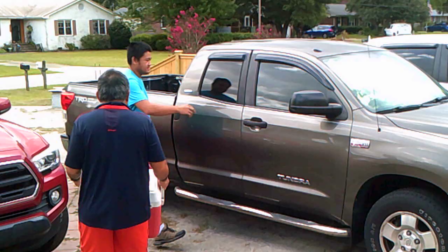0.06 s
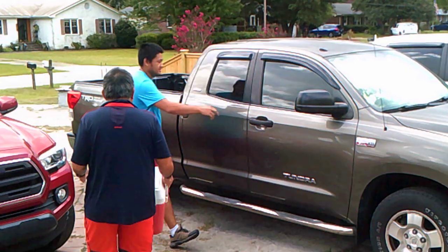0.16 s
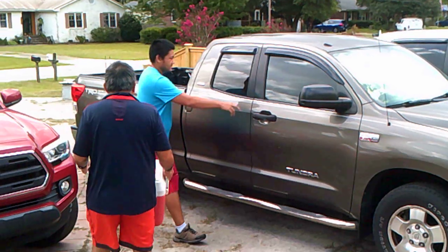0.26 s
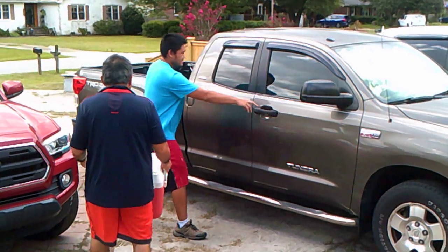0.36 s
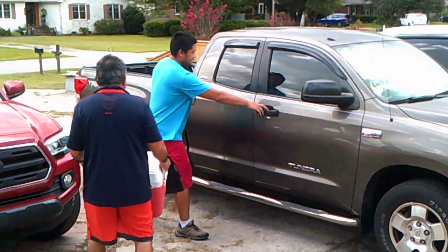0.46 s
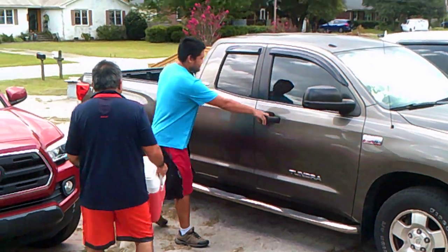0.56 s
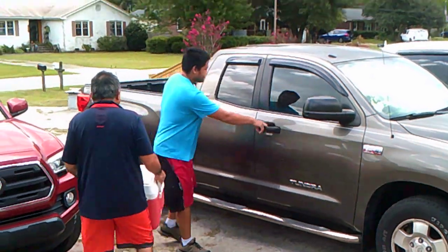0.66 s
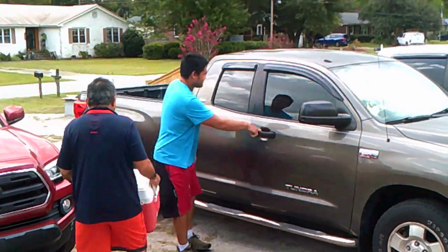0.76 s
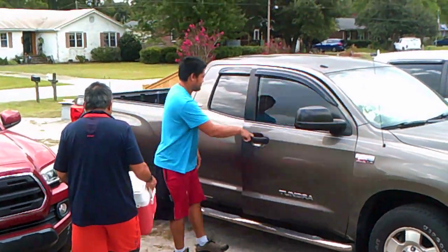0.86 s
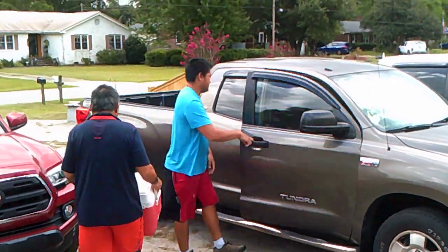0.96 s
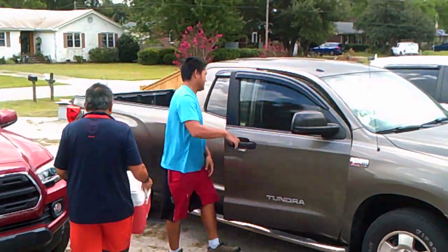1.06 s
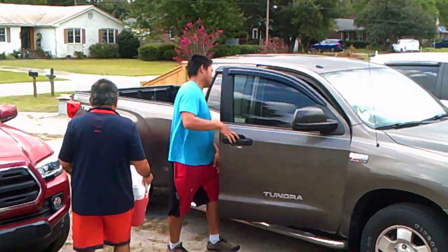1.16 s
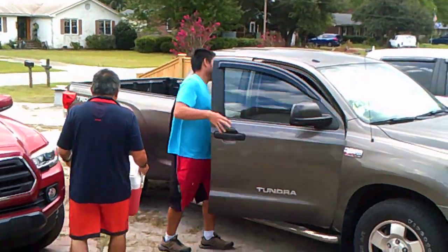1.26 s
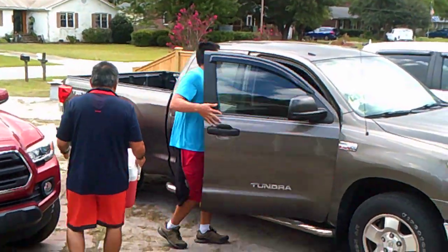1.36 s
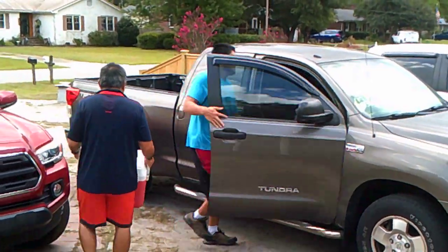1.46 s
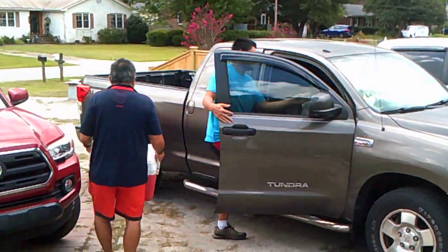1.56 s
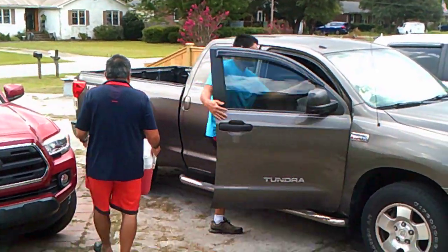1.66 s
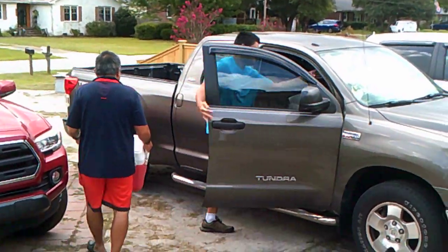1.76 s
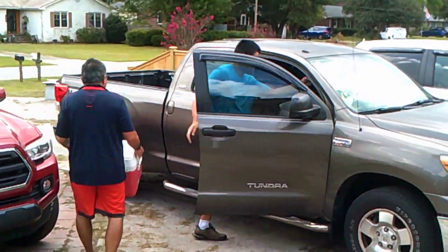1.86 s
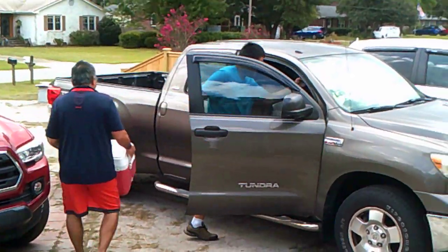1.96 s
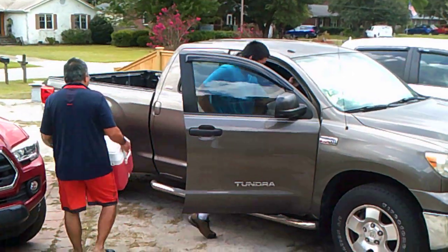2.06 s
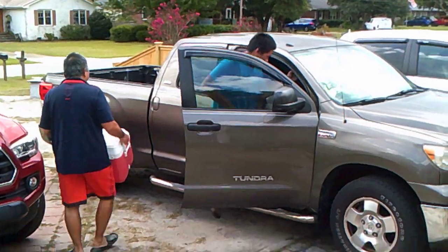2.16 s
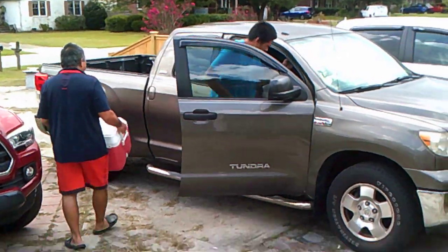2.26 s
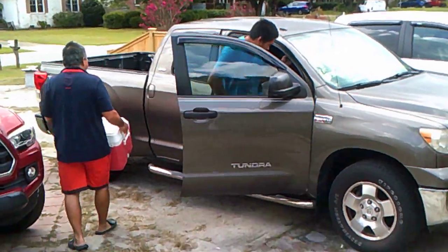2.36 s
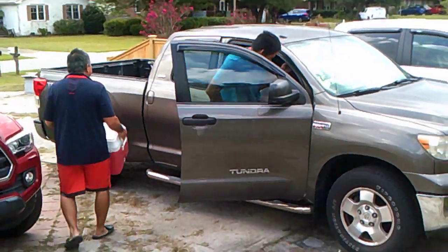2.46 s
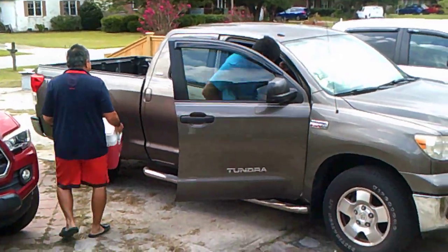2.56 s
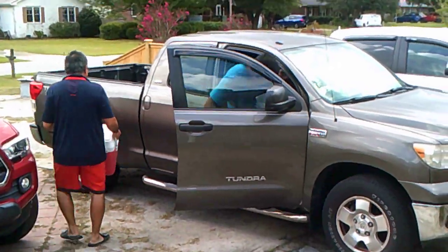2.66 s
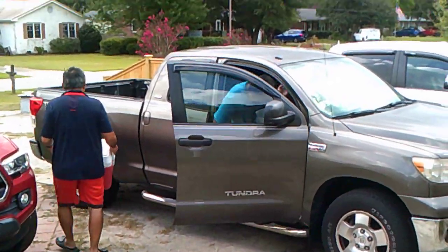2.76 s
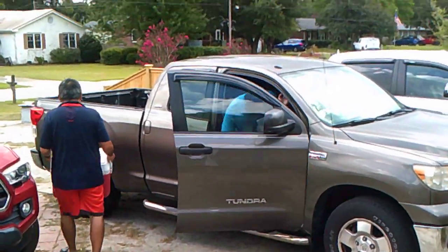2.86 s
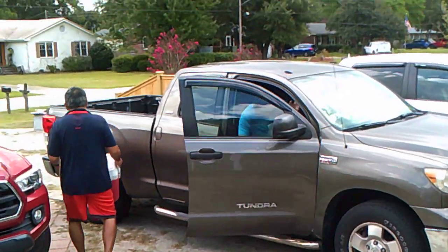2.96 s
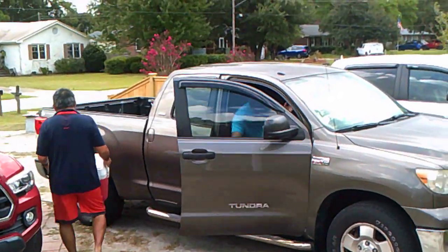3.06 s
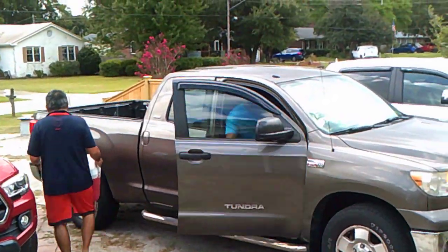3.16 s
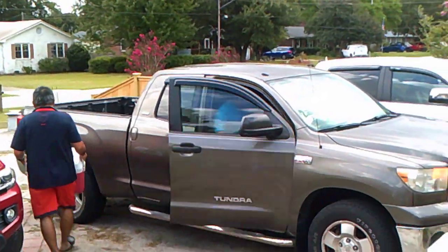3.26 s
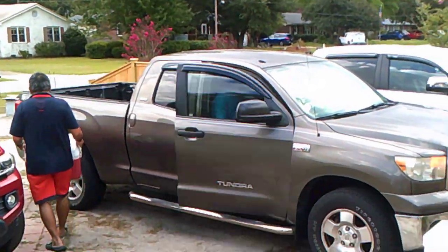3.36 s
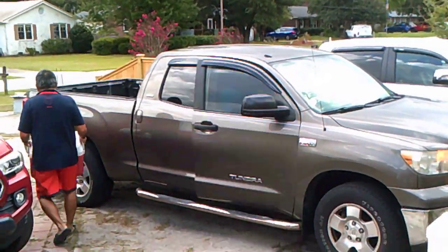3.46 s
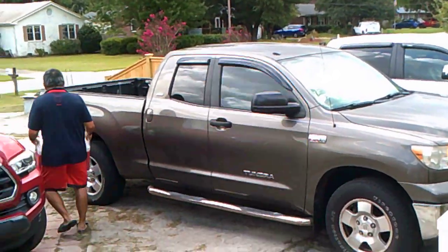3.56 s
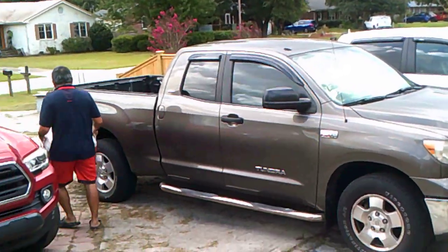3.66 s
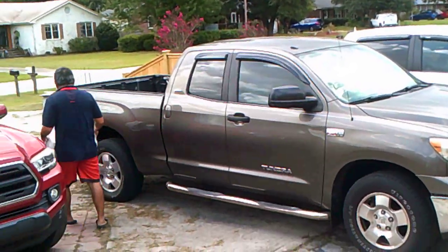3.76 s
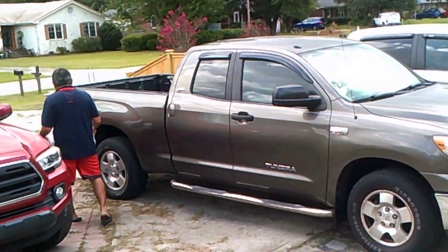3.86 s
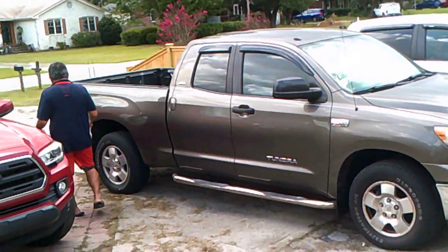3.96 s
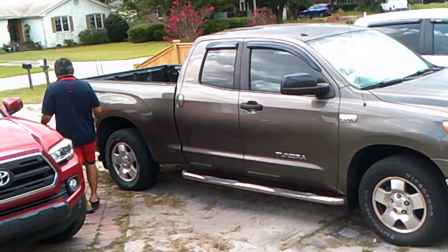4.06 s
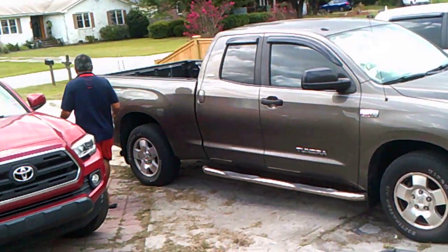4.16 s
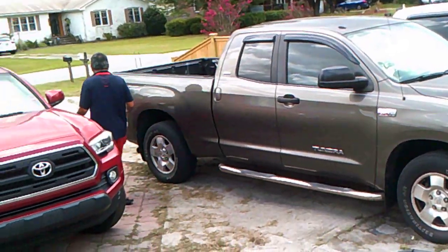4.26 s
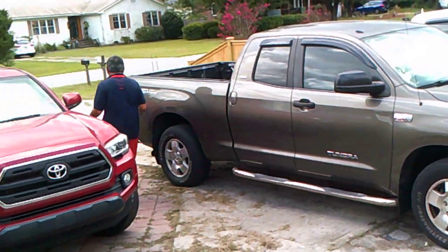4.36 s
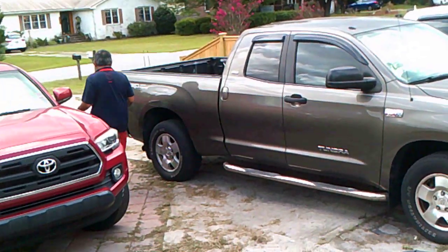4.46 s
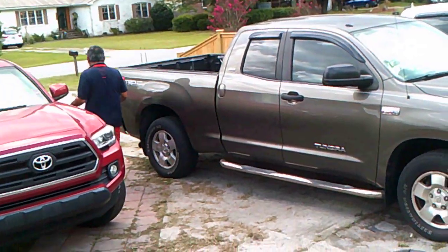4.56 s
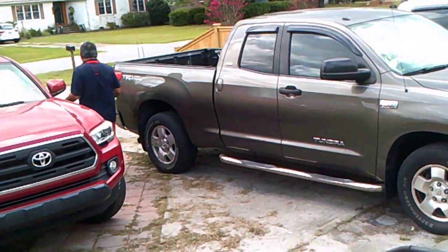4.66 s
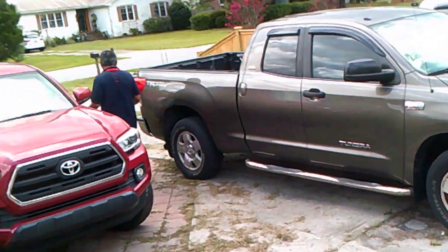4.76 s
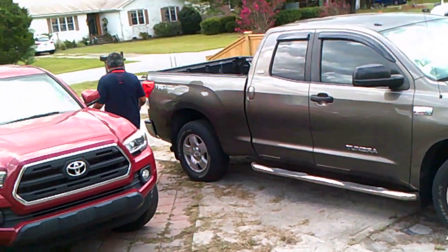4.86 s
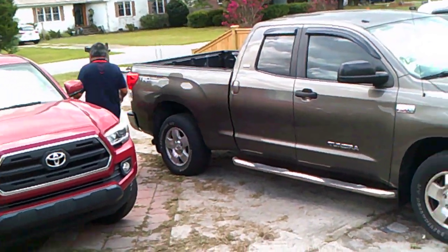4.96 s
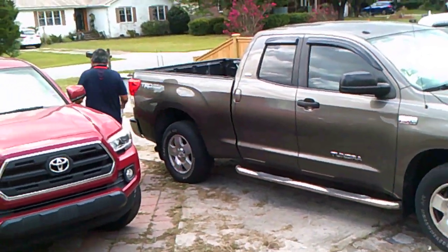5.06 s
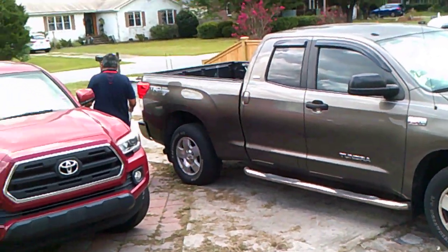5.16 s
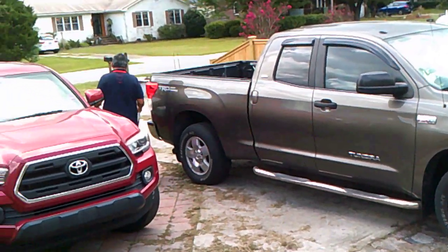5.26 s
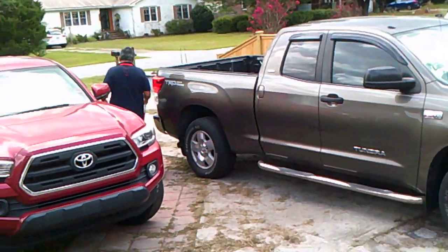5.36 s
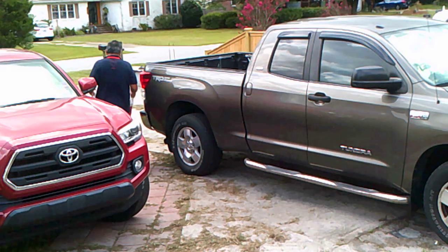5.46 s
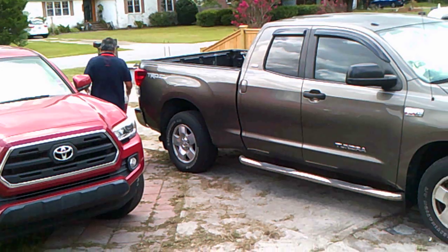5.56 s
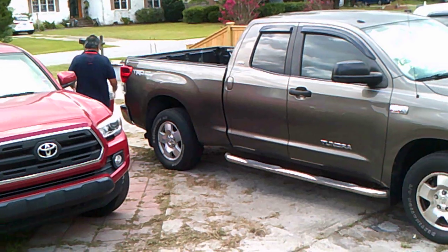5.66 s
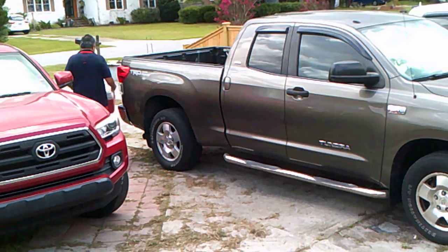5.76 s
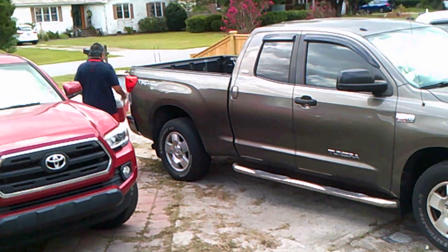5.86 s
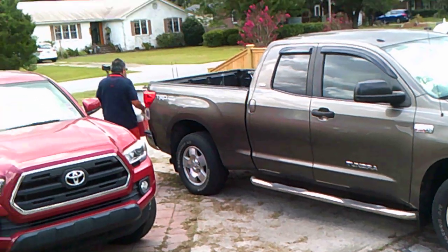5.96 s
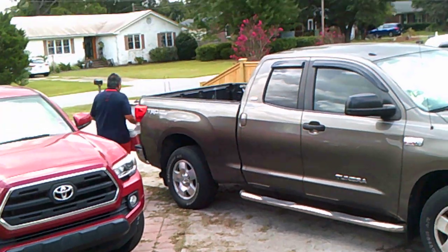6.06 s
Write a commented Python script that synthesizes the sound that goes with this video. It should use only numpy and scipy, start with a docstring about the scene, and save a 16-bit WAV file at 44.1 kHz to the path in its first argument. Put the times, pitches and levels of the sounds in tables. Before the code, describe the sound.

Over constant outdoor hiss and easing breeze, a truck door thumps shut, another unlatches with a sharp clack, and finally slams with a booming, distorted thud.

```python
"""On a driveway a pickup's rear door thuds shut, the front handle is gripped and its latch snaps open.
Someone climbs in and slams the door, whose push of air overloads a dull little microphone; the door shudders to rest.
Blows are decaying door modes, rattle and crack noise; the cab's air and body swing as low damped sines.
Shoes scuff the paving as swells of noise, over a steady hiss, faint wavering tones and a breeze that slowly eases."""
import sys
import numpy as np
from scipy import signal
from scipy.fft import rfft, irfft, next_fast_len
from scipy.io import wavfile
from scipy.ndimage import uniform_filter1d

SR = 44100
rng = np.random.default_rng(int(sys.argv[2]) if len(sys.argv) > 2 else 0)


def store_pcm(level_fs):
    """Save levels as 16-bit WAV."""
    pcm = np.round(np.clip(level_fs, -1, 1) * 32767).astype(np.int16)
    wavfile.write(sys.argv[1], SR, np.atleast_2d(pcm).T)


N = 269451  # samples

# Modes of the struck door. Each row: frequency in Hz, relative level in dB, T60 in seconds.
DOOR_MODES = [(145.8, 2, 0.31), (200.3, -4.5, .24), (285, -15, 0.37), (342, -7, 0.062), (432, -15, 0.42),
              (569, 0, 0.076), (617, -5.5, .1), (876, -4.5, 0.21), (1023, -9.5, 0.19), (1047, -10, .14),
              (1230, -7.5, 0.11), (1344, -0.5, 0.2), (1612, 2.5, 0.092), (1610, -20, 0.093),
              (1950, -11.5, 0.074), (2536, -30, 0.09)]
# Rattle spectrum of latch and trim. Each row: frequency in Hz, relative density in dB per Hz.
RATTLE_SPECTRUM = [(60, -13), (150, 2.5), (390, -8.5), (900, -3), (1500, 0.5), (2100, -9.5), (3000, -18.5),
                   (4000, -31.5), (5200, -47.5), (7500, -34.5), (9500, -68)]
# Decay of that rattle, before each blow scales it. Each row: frequency in Hz, T60 in seconds.
RATTLE_DECAY = [(150, .2), (800, 0.13), (1600, 0.092), (3000, 0.039), (7000, .04)]
# Crack spectrum of steel on steel. Each row: frequency in Hz, relative density in dB per Hz.
CRACK_SPECTRUM = [(200, -26), (1000, 5), (1800, -2.5), (3000, -30), (4000, 1.5), (5200, -5), (7000, -5.5),
                  (8500, -36.5), (10000, -40.5)]

# A shutting door hits the latch's two notches, and rebounds if slammed. Each row: start in seconds, level in dB.
LATCH_STRIKES = [(0.102, -8.5), (0.11, -9), (3.524, 1), (3.542, -3), (3.573, -3)]
# After the slam the door shudders in evenly spaced, ever weaker blows.
SHUDDER_S, SHUDDER_GAP_S, SHUDDER_DB, SHUDDER_FALL_DB_PER_S = 3.592, 0.012, -16, 230

# A moving door pushes on the cab's air. Each row: start in seconds, level in dB, frequency in Hz, T60 in seconds.
AIR_PUSHES = [(0.104, 2, 25.9, 0.56), (0.731, -6, 23.3, 0.53), (3.513, 18, 32.3, 0.19),
              (3.553, 25, 25, 0.1064)]
# Swing of cab and roof after each push. Each row: frequency in Hz, relative level in dB, T60 in seconds.
CAB_MODES = [(28.27, -6, 0.4), (55.2, -13.5, 0.4), (91.9, -19, 0.8)]
CAB_LAG_S, CAB_FULL_DB = 0.06, 2.5  # the swing's delay, and the push beyond which it grows no further

# The pulled handle snaps the latch open. Each row: start in seconds, level in dB.
LATCH_CLACKS = [(1.152, -1), (1.1587, -2.5), (1.165, -8.5), (1.178, -12)]
CRACK_DB, CRACK_PER_DB = 15, 1.2  # crack of a 0 dB clack; softer clacks lose it faster than their body

# Soft blows on a door panel from a seal, a hand or a knee.
# Each row: start in seconds, level in dB, panel boom in dB.
PANEL_THUMPS = [(0.086, -25, 14), (0.141, -19.5, 13), (0.662, -14.5, 1), (1.965, -27.5, -1),
                (3.502, -18, -7)]
# Small fittings click as the cab is boarded. Each row: start in seconds, level in dB, brightness in dB per octave.
FITTING_TICKS = [(2.404, -26, 13), (2.413, -20.5, 13), (2.418, -18.5, 2.5), (2.874, -21, 8),
                 (2.889, -21, 4)]

# Scuffs of shoes and clothes.
# Each row: middle in seconds, seconds from there to a fall of e squared, level in dB.
SCUFF_STROKES = [(0.244, 0.12, -39), (0.648, 0.085, -32.5), (0.79, 0.07, -35.5), (0.916, 0.11, -31),
                 (2.608, 0.23, -32.5), (3.731, 0.034, -33.5), (4.02, 0.15, -31), (4.144, 0.046, -36.5),
                 (4.32, 0.06, -39)]
# Friction spectrum of the scuffs. Each row: frequency in Hz, relative density in dB per Hz.
SCUFF_SPECTRUM = [(300, -21.5), (900, -14.5), (1600, 4), (2700, -7.5), (3800, -14.5), (5000, -22.5),
                  (7500, -21), (9500, -48.5)]

# Outdoor hiss spectrum. Each row: frequency in Hz, relative density in dB per Hz.
HISS_SPECTRUM = [(60, 1), (130, 0), (250, -0.5), (420, -9), (700, -4), (1150, -3.5), (1520, -1), (1710, 3),
                 (1880, -3.5), (2750, -18.5), (3600, -23.5), (4700, -37.5), (7800, -31), (9500, -63.5)]
HISS_DB = -29
# Breeze spectrum at the microphone. Each row: frequency in Hz, relative density in dB per Hz.
BREEZE_SPECTRUM = [(8, -3), (20, 0), (35, -1.5), (50, -1.5), (75, -14.5), (110, -14), (180, -33),
                   (400, -49.5), (1000, -92.5)]
BREEZE_DB, BREEZE_EASE_DB_PER_S = -19, 1.67  # level at the start, and its steady fall
# Faint machine hum. Each row: mean frequency in Hz, level in dB, start in seconds, end in seconds.
HUM_TONES = [(901, -44, 3, 6.3), (164.8, -45.5, 3.5, 6.3), (247.4, -50, 3, 4.8), (282.5, -47.5, 0, 3.1)]

CEILING = 0.705  # amplitude at which the input clips
EDGE_HZ = 15700  # upper band limit


def amp(db):
    """Decibel law: 20 dB is a tenfold amplitude."""
    return 10 ** (np.asarray(db) / 20)


def unit(x):
    """Normalisation of a signal to rms 1."""
    return x / np.sqrt(np.mean(x ** 2) + 1e-20)


def read(points, hz):
    """Linear interpolation of a curve on a log-frequency axis."""
    f, value = np.transpose(points)
    return np.interp(np.log(hz + 1), np.log(f + 1), value)


def add(mix, s, sound):
    """Superposition: a sound is summed into the mix from time s."""
    part = mix[max(round(s * SR), 0):][:len(sound)]
    part += sound[:len(part)]


def noise(colour, count=N):
    """Spectral shaping: white noise is weighted by the given spectrum and brought to rms 1."""
    size = next_fast_len(count)
    hz = np.fft.rfftfreq(size, 1 / SR)
    white = rfft(rng.standard_normal(size))
    return unit(irfft(white * amp(read(colour, hz)), size)[:count])


def drift(rate):
    """Random modulation: Gaussian low-pass noise of rms 1, changing about rate times a second."""
    size = next_fast_len(N)
    hz = np.fft.rfftfreq(size, 1 / SR)
    white = rfft(rng.standard_normal(size))
    return unit(irfft(white * np.exp(-(hz / rate) ** 2), size)[:N])


def knock(boom_db, boom_hz, tilt_db, decay, crack_db, ring_db=-14, rattle_db=-1, boom_octaves=0.59, crack_t60=0.011):
    """Impact excitation: a brief crack, then the door's modes ring and loose parts rattle, the treble dying first."""
    t = np.arange(SR // 2) / SR

    def colour(f):
        """Contact hardness tilts the spectrum; the struck panel shapes one region."""
        tilt = tilt_db * np.log2(np.clip(f, 400, 4000) / 1200)
        boom = boom_db * np.exp(-(np.log2((f + 1) / boom_hz) / boom_octaves) ** 2)
        return tilt + boom

    ring = np.zeros(len(t))
    for f, db, t60 in DOOR_MODES:
        envelope = amp(db + colour(f) - 60 * t / (t60 * decay))
        ring += envelope * np.sin(2 * np.pi * (f * t + rng.random()))

    # the rattle decays at its own rate in each frequency band
    hz, age, bands = signal.stft(noise(RATTLE_SPECTRUM, len(t)), SR, nperseg=512)
    hz = hz[:, None]
    band_gain = amp(colour(hz) - 60 * age / (read(RATTLE_DECAY, hz) * decay))
    rattle = signal.istft(bands * band_gain, SR, nperseg=512)[1][:len(t)]

    crack = noise(CRACK_SPECTRUM, len(t)) * amp(crack_db - 60 * t / crack_t60)
    onset = 1 - np.exp(-(t / 0.0008) ** 2)
    return (amp(ring_db) * ring + amp(rattle_db) * rattle + crack) * onset


def push(hz, t60):
    """Damped oscillation: a low swing starts from rest and dies away exponentially."""
    t = np.arange(SR) / SR
    onset = 1 - np.exp(-t / 0.0016)
    return amp(-60 * t / t60) * np.sin(2 * np.pi * hz * t) * onset


def truck():
    """Superposition of all the blows and air pushes."""
    return slam() + cab() + latches() + panels() + fittings()


def slam(count=5):
    """Repeated impact: doors strike their latches hard and short; after the slam a hollow shudder dies away."""
    out = np.zeros(N)
    for s, db in LATCH_STRIKES:
        strike = knock(boom_db=3.0, boom_hz=620, tilt_db=-2.0, decay=0.6, crack_db=1.5)
        add(out, s, amp(db) * strike)
    for age in SHUDDER_GAP_S * np.arange(count):
        blow = knock(boom_db=9.5, boom_hz=344, tilt_db=-5, decay=1.0, crack_db=-3.5)
        add(out, SHUDDER_S + age, amp(SHUDDER_DB - SHUDDER_FALL_DB_PER_S * age) * blow)
    return out


def cab():
    """Cavity and body resonance: each push of air is followed by a limited swing of cab and roof."""
    out = np.zeros(N)
    swing = sum(amp(db) * push(hz, t60) for hz, db, t60 in CAB_MODES)
    for s, db, hz, t60 in AIR_PUSHES:
        add(out, s, amp(db) * push(hz, t60))
        add(out, s + CAB_LAG_S, amp(min(db, CAB_FULL_DB)) * swing)
    return out


def latches():
    """Level-dependent impact of steel: the harder the blow, the more of it is crack."""
    out = np.zeros(N)
    for s, db in LATCH_CLACKS:
        crack_db = CRACK_DB + CRACK_PER_DB * db
        clack = knock(boom_db=4, boom_hz=172, tilt_db=1.0, decay=0.93, crack_db=crack_db)
        add(out, s, amp(db) * clack)
    return out


def panels():
    """Soft contact excites mostly low modes: dull thumps leave the door ringing."""
    out = np.zeros(N)
    for s, db, boom_db in PANEL_THUMPS:
        thump = knock(boom_db, boom_hz=145, tilt_db=-2.5, decay=1.58, crack_db=-11)
        add(out, s, amp(db) * thump)
    return out


def fittings(steel_s=2.416, steel_hz=478, steel_db=-34, steel_t60=1.6):
    """Light impact gives thin clicks; one lightly damped steel part sings as the cab takes a person's weight."""
    out, t = np.zeros(N), np.arange(SR) / SR
    for s, db, tilt_db in FITTING_TICKS:
        tick = knock(boom_db=-13.5, boom_hz=200, tilt_db=tilt_db, decay=1.0, crack_db=-6)
        add(out, s, amp(db) * tick)
    add(out, steel_s, amp(steel_db - 60 * t / steel_t60) * np.sin(2 * np.pi * steel_hz * t))
    return out


def scuffs(grain_db=4, shuffle_db=-55, restless_db=3):
    """Friction noise: short gritty swells over a faint, restless shuffling."""
    t = np.arange(N) / SR
    stroke = amp(shuffle_db + restless_db * drift(7))
    for s, length, db in SCUFF_STROKES:
        stroke += amp(db) * np.exp(-2 * ((t - s) / length) ** 2)
    grit = unit(noise(SCUFF_SPECTRUM) * amp(grain_db * drift(130)))
    return stroke * grit


def outdoors(flutter_db=0.41, gust_db=1.5):
    """Broadband ambient noise: a steady hiss, and a lumpy breeze on the microphone that slowly eases."""
    hiss = amp(HISS_DB) * noise(HISS_SPECTRUM) * amp(flutter_db * drift(11))
    breeze_level = amp(BREEZE_DB - BREEZE_EASE_DB_PER_S * np.arange(N) / SR)
    breeze = unit(noise(BREEZE_SPECTRUM) * amp(gust_db * drift(12)))
    return hiss + breeze_level * breeze


def hum(waver_hz=4, waver_db=1, fade_s=0.13):
    """Frequency and amplitude modulation: thin tones waver, and fade in and out."""
    t, out = np.arange(N) / SR, np.zeros(N)
    for hz, db, start, end in HUM_TONES:
        cycles = np.cumsum(hz + waver_hz * drift(12)) / SR
        tone = unit(np.sin(2 * np.pi * cycles) * amp(waver_db * drift(13)))
        fade = np.clip(np.minimum(t - start, end - t) / fade_s, 0, 1)
        out += amp(db) * tone * fade
    return out


def scene():
    """Superposition of everything that reaches the microphone."""
    return (truck() + scuffs() + outdoors() + hum())[None]


def record(dry):
    """Saturation blanks the clatter at each clipped crest; two running means dull it; then the band limit."""
    clipped = np.clip(dry, -CEILING, CEILING)
    dull = uniform_filter1d(uniform_filter1d(clipped, size=8), size=8)  # size in samples
    low_pass = signal.firwin(255, EDGE_HZ, window=("kaiser", 9), fs=SR)
    return signal.oaconvolve(dull, low_pass[None], "same")


dry = scene()
out = record(dry)
store_pcm(out)
```